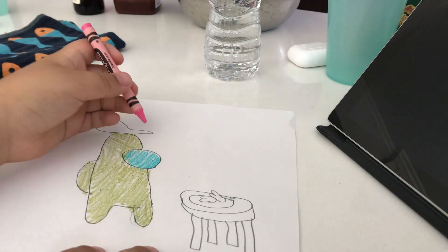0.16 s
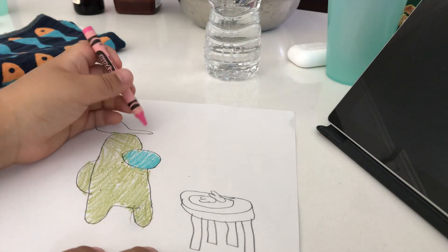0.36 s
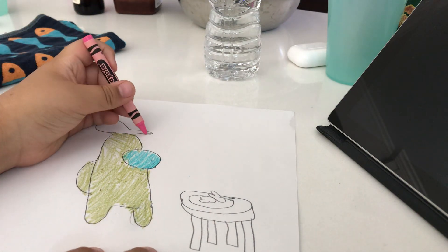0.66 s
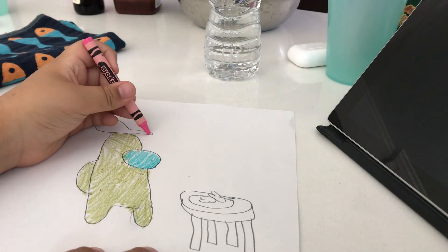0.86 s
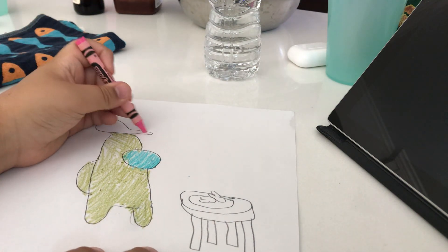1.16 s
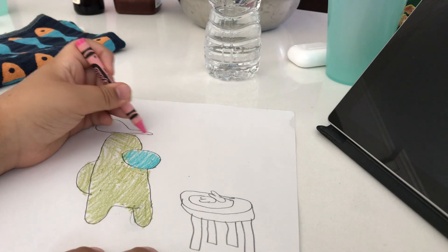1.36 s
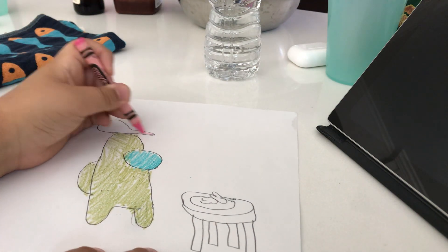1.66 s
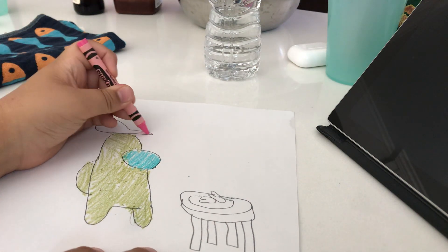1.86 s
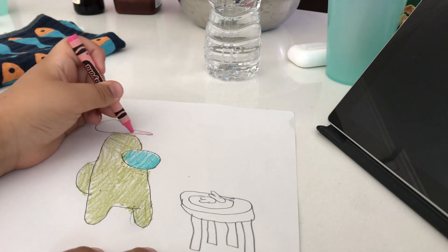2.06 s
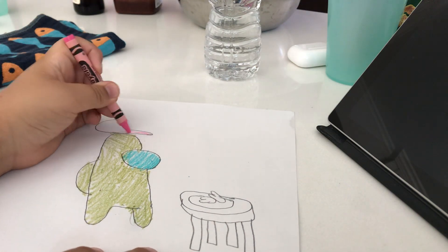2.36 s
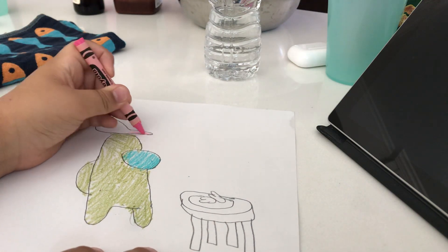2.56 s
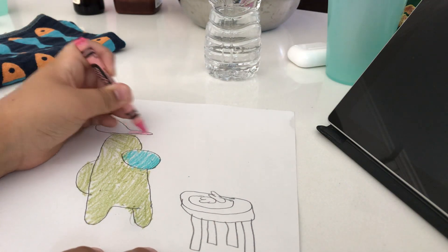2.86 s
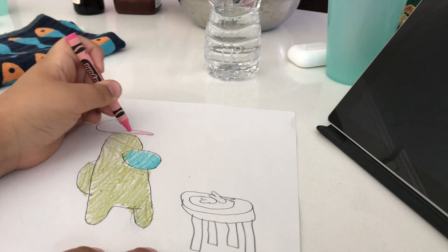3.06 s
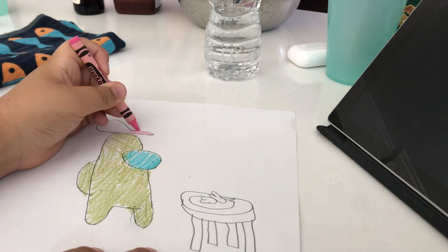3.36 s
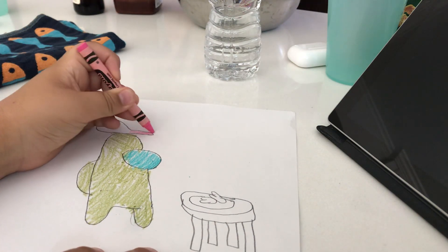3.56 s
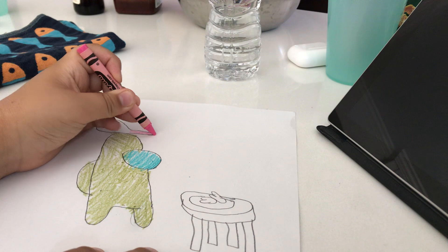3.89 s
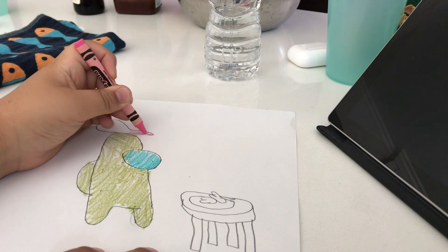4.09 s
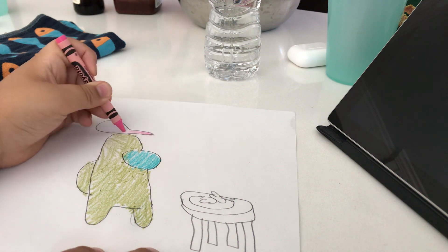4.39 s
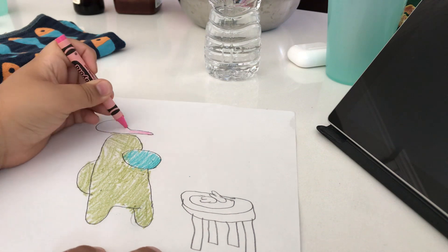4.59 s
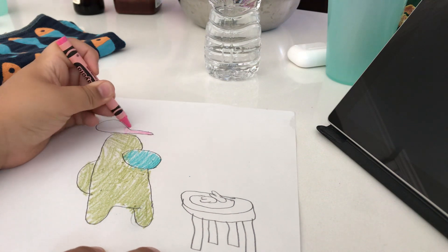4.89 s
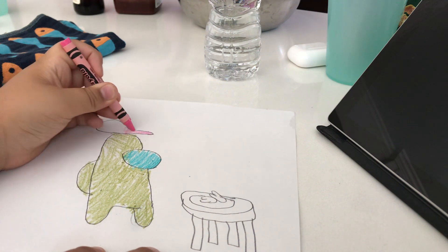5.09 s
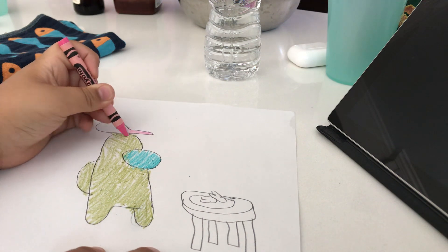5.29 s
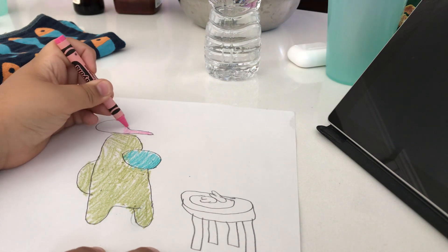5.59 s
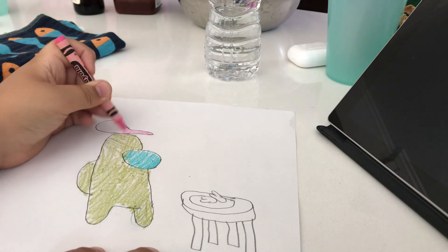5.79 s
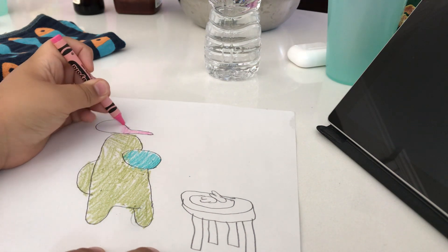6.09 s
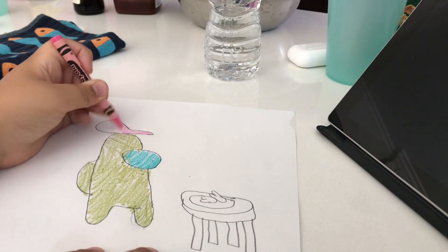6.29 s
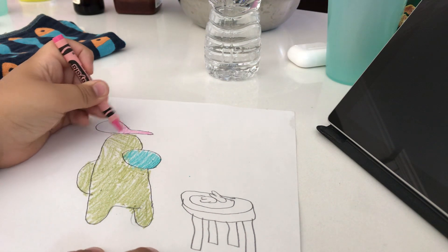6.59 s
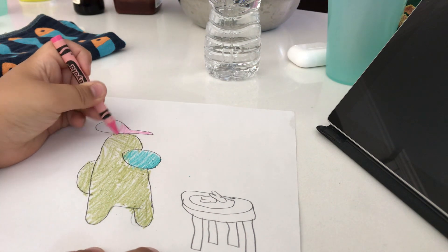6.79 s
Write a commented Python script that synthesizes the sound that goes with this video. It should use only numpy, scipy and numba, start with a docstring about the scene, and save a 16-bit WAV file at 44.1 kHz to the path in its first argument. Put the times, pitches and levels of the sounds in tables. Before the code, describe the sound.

A wax crayon rubs on paper lying on a hard table, close to the microphone in a small room. It begins with a few light touches, then firmer strokes from about 0.6 seconds, with a soft low bump of the hand at 0.7 seconds. The strokes are short, quick and uneven, a dry rasp and hiss with some resonance from the table and occasional faint, tiny squeaks. From about 2.4 seconds small waxy ticks dot the scratching, the sharpest near 3.8 seconds. The firmest rubs come around 5.5 to 5.8 seconds. A light knock on the table sounds at about 6.3 seconds, then a louder, sharp knock at 6.5 seconds, after which a hollow object rings briefly and the crayon is silent. A faint low rumble and a steady appliance hum continue underneath throughout.

```python
"""In a small room, close to a phone, a wax crayon rubs paper on a hard table in short, quick strokes.
Friction over the fibres is a train of random impulses: it makes the sheet rasp and hiss and drives
the table into a drone. Now and then the tip sticks and slips with a squeak, or wax tears with a tick.
Near the end two knocks excite the table's modes, and after the second a hollow object rings on.
The room reverberates over a steady rumble and the hum of an appliance."""
import sys
import numpy as np
from scipy import signal
from scipy.fft import rfft, irfft
from scipy.io import wavfile
from scipy.ndimage import uniform_filter1d
from numba import njit

SR = 44100
rng = np.random.default_rng(int(sys.argv[2]) if len(sys.argv) > 2 else 0)


def inscribe(sig):
    """Save sig as 16-bit PCM at rate SR to the path in sys.argv[1].

    A 1-D sig is mono; a 2-D sig holds one channel per row.
    Samples are clipped to [-1, 1] before scaling.
    """
    pcm = np.round(np.clip(np.atleast_2d(sig).T, -1, 1) * 32767)
    wavfile.write(sys.argv[1], SR, pcm.astype(np.int16))


N = 306054

# Spectral shapes: f/Hz, relative spectral level/dB
AIR_SPECTRUM = [(26, -46.5), (45, 4), (81, -2.5), (187, -4), (251, -4.5), (346, -9), (411, -11.5),
                (760, -20.5), (880, -21), (948, -34), (1020, -27), (1210, -23), (1370, -27.5), (2350, -31),
                (16000, -49.5)]  # rumble and hiss of the room
RATTLE_SPECTRUM = [(250, -28.5), (500, 3), (1000, 8), (1500, -7), (2300, -9), (3000, -10.5), (6000, -17.5),
                   (15500, -24)]  # noise of a knock
TONE_SPECTRUM = [(760, -24), (1300, -3.5), (2160, -1.5), (2470, -3.5), (2780, -5.5), (3200, -11),
                 (4160, -10.5), (7040, -120)]  # rubbed table, midrange
DRONE_SPECTRUM = [(210, -25.5), (350, 1), (553, 4.5), (927, 3.5), (1040, 7.5), (1120, 3.5), (1400, -5),
                  (1820, 8), (3080, -120)]  # rubbed table, lower range
RASP_SPECTRUM = [(1760, -34.5), (3000, -1.5), (3860, 1.5), (4750, -2.5), (5830, 1.5), (6200, -13.5),
                 (8060, -46), (13600, -120)]  # sheet, low treble
HISS_SPECTRUM = [(3650, -23.5), (6200, 3.5), (6430, 1.5), (8320, 2.5), (9320, 2.5), (10000, -2),
                 (13000, -4), (22000, -120)]  # sheet, high treble
CRISP_SPECTRUM = [(5880, -59), (10000, -8), (11500, -1.5), (13800, 2.5), (15200, 0.5), (15700, -16),
                  (16000, -3.5)]  # sheet, crisp top
# Partials of the appliance: f/Hz, frequency wander/Hz, level/dB
HUM_PARTIALS = [(77.9, 6.16, -63), (241.1, 2.98, -56.5), (394.6, 5.95, -66.5)]
# Reverberation time by band: f/Hz, T60/s
ROOM_DECAY = [(250, 0.33), (1000, 0.44), (4000, 0.52), (12000, 0.31)]
# Modes of the hollow object: f/Hz, level/dB, T60/s
VESSEL_MODES = [(951.5, -36.5, .55), (959, -37.5, .5)]
# Modes of the table top: f/Hz, relative level/dB in the first knock, the same in the second, T60/s
TABLE_MODES = [(75.5, -7, -12, 0.18), (134.6, -8, -11, 0.22), (215, -9, -6.5, 0.067), (252, -7, -8, 0.08),
               (345, -1, -16, 0.091), (374, -22, -8.5, 0.18), (405, -4, 2.5, 0.033), (635, 2.5, -5, 0.039),
               (677, -4.5, -2, 0.093), (1310, 2.5, -10, 0.043), (1484, -3, -7.5, 0.088),
               (1760, -3.5, -21, 0.087), (1856, 4, 8, 0.02), (2210, -30, -30, .08)]
# Knocks: t/s, relative level/dB, contact time/s, rattle gain/dB, crack gain/dB, wave delay at 100 Hz/s
KNOCKS = [(6.263, -20.5, 0.00023, -8, 2, 0.0097), (6.5, -11.5, 0.00032, -4, 9.5, 0.0102)]
# Soft bumps of the hand on the table: t/s, level/dB, f/Hz, T60/s
HAND_BUMPS = [(.71, -33, 157, 0.11)]
# Spells of regular stick-slip: centre t/s, relative level/dB, f/Hz, nominal duration/s
SQUEAKS = [(0.083, -45, 1725, 0.016), (0.822, -43.5, 1960, 0.023), (0.854, -48, 2000, 0.022),
           (1.32, -40.5, 2097, 0.017), (1.622, -48, 2140, 0.055), (1.773, -40, 2430, 0.011),
           (1.836, -46, 2500, 0.025), (1.876, -42, 2420, 0.022), (2.052, -44, 4500, 0.01),
           (2.118, -45, 4200, 0.008), (2.192, -51.5, 1000, 0.014), (2.396, -46, 2330, 0.022),
           (3.238, -45, 1560, 0.033), (3.51, -42, 2255, 0.014), (3.617, -48, 3840, 0.029),
           (3.669, -49.5, 964, 0.052), (3.783, -41, 1964, 0.038), (4.02, -45.5, 2200, 0.02),
           (4.145, -53, 2250, 0.03), (4.79, -44, 3700, 0.02), (5.01, -42.5, 5450, 0.034),
           (5.093, -46.5, 5900, 0.051), (5.725, -44, 2120, 0.028)]
# Tears of wax: t/s, peak level/dB, f/Hz
WAX_TICKS = [(0.6595, -37, 4700), (2.373, -26, 9800), (2.62, -28, 10100), (2.8836, -30, 11000),
             (2.9188, -33, 10300), (3.0253, -33, 11400), (3.1454, -28, 6000), (3.1553, -31, 9500),
             (3.1627, -26, 10100), (3.2132, -26.5, 8000), (3.226, -30, 7100), (3.408, -27, 5500),
             (3.4286, -23.5, 7000), (3.4976, -20, 10700), (3.531, -25, 10300), (3.5602, -18, 11500),
             (3.618, -34, 9100), (3.6583, -34, 6960), (3.828, -12.5, 11200), (3.9957, -28.5, 6000),
             (4.1164, -32, 10400), (4.19, -28, 11900), (4.216, -24, 11000), (4.2684, -27, 9700),
             (4.2818, -19, 11500), (4.7304, -25, 11400), (4.866, -28, 7900), (4.998, -25, 6330),
             (5.0745, -31, 7000), (5.459, -31, 7000), (5.5183, -20, 12900), (5.524, -25, 5460),
             (5.6508, -24, 9200), (5.6836, -27, 8850), (5.7204, -17, 8560), (5.7796, -30, 8400),
             (5.7934, -18, 10500), (5.952, -31, 10600), (6.0301, -33, 8100), (6.17, -26, 9700),
             (6.389, -37, 7800), (6.3955, -37, 5600)]
# Light drag of the tip: t/s, tone drive level/dB, sheet gain/dB, drone gain/dB (also acts on strokes)
DRAG = [(0.0, -52.5, -11, -6), (0.22, -76, -4, 4.5), (0.6, -75.5, -5, -3.5), (0.9, -58.5, -8, -2),
        (1.12, -72, 3.5, 1), (1.24, -81, -18, 6), (1.4, -56.5, -2.5, -6.5), (2.2, -60, 0, -10),
        (2.45, -52.5, -2, -5.5), (2.8, -62.5, -6.5, -9), (3.1, -54, -2, -5), (3.4, -64, -4.5, -15.5),
        (3.7, -58.5, 3.5, -6), (4.4, -63.5, -0.5, -5), (4.8, -60, 4, -10), (5.38, -61, 4, -13),
        (5.65, -58.5, 3.5, -3), (6.0, -66, 4.5, -5), (6.2, -60, -7, -4), (6.3, -110, 9, 0)]
# Strokes: t/s, duration/s, tone drive level/dB, rasp gain/dB, hiss gain/dB, catch gain/dB
STROKES = [(0.003, 0.03, -57.5, 4, -7, -4), (0.072, 0.032, -56.5, 6, -5.5, 8),
           (0.163, 0.017, -62.5, -2, -1.5, 5), (0.338, 0.012, -62.5, -4, -4, -7),
           (0.508, 0.028, -70, 0, -3.5, 0), (0.617, 0.036, -56, 2, -12, -13),
           (0.6575, 0.052, -48, 7, -2, 0.5), (0.708, 0.052, -47.5, -1, -8, -5),
           (0.768, 0.064, -52, 5, 0.5, -7), (0.844, 0.034, -51, 1.5, -4.5, -2),
           (0.931, 0.068, -59, -3, -27, 1), (1.168, 0.021, -61, -19, -23, -3),
           (1.209, 0.021, -61, -0.5, -18, -1), (1.257, 0.036, -54, 1, -9, 5.5),
           (1.312, 0.024, -51.5, 0, -2, 5), (1.349, 0.065, -53, -2.5, -9.5, -7),
           (1.437, 0.014, -50.5, -8, -6, 2), (1.4576, 0.066, -53.5, -13, -8, 2),
           (1.544, 0.011, -53, 0, -13, 7), (1.572, 0.077, -49.5, -2, -7, 5),
           (1.6824, 0.03, -52, -0.5, -9, 4), (1.743, 0.11, -54, 3, -3.5, -2),
           (1.7917, 0.11, -44, -2, -6.5, 0), (1.993, 0.019, -67.5, 7, -5, 10),
           (2.026, 0.014, -67, -4, -3, 0), (2.046, 0.0082, -62.5, 12, -6, 2), (2.091, 0.014, -71, 11, 9, 0),
           (2.113, 0.0091, -55, 13, -6, 5), (2.134, 0.03, -63, -1, -4, -6), (2.181, 0.027, -57, 4, 0, -3),
           (2.256, 0.035, -46, -0.5, -5.5, -22), (2.33, 0.016, -61, 4, 3, -5),
           (2.3745, 0.062, -45.5, -1, -5.5, 0.5), (2.449, 0.081, -51.5, 5, -2, 8),
           (2.537, 0.03, -52.5, 3, -11, 4), (2.62, 0.04, -56, 2.5, -5.5, 12),
           (2.793, 0.019, -61.5, 7, -2, -1), (2.88, 0.017, -58.5, 6, -1, 11), (2.919, 0.019, -70, 6, 8, 2),
           (2.942, 0.069, -49, 1, -3.5, 8), (3.017, 0.071, -45, -4.5, -10.5, 8.5),
           (3.1464, 0.042, -52.5, 0.5, -0.5, 7.5), (3.196, 0.049, -58, 6, -1, -6),
           (3.218, 0.04, -56.5, -4, -3, 9), (3.363, 0.018, -58.5, -10, -1, 0),
           (3.422, 0.054, -61.5, 13.5, 10.5, 4), (3.5, 0.053, -47, 0.5, 0, -1),
           (3.533, 0.065, -49, 0.5, 1, 0), (3.607, 0.061, -54.5, 1, 0, 1), (3.7135, 0.055, -60, 1, 2.5, -1),
           (3.7676, 0.038, -45, 2, 2, 2.5), (3.811, 0.089, -49, 1.5, 0, -7),
           (3.943, 0.015, -60.5, 4, -4, 2), (3.99, 0.07, -58.5, -1, -1, -1), (4.12, 0.035, -66, 2, 6, 0),
           (4.167, 0.02, -66.5, 8, 12, -3), (4.191, 0.02, -61.5, 12, 11, -2),
           (4.217, 0.049, -59.5, 3, 4, 1), (4.243, 0.026, -59, -7, -7, 0), (4.277, 0.066, -53, 2, 2.5, -4),
           (4.47, 0.016, -69, -4, -12, -4), (4.5205, 0.031, -59, 5.5, 1.5, 5), (4.564, 0.031, -57, 3, 6, 0),
           (4.59, 0.062, -47, -1, -4.5, -2), (4.697, 0.025, -64, 1, -2, -1),
           (4.729, 0.033, -64, 6, 16.5, 1), (4.781, 0.039, -61.5, 11, -10, 8), (4.86, 0.053, -72, 1, -2, 7),
           (4.925, 0.035, -57, 3, -5, 1), (4.995, 0.058, -63, 8, 10.5, 4), (5.063, 0.06, -49, 0, -3, 1),
           (5.2315, 0.042, -60.5, 3, 4.5, 2), (5.304, 0.015, -74, 1, 15, -7),
           (5.355, 0.02, -59, -11, -9, -5), (5.376, 0.056, -57.5, 0, -8, 1),
           (5.446, 0.06, -34.5, 1, -1, -19), (5.518, 0.049, -52.5, 6, 2, 8), (5.654, 0.02, -70, -2, 14, 5),
           (5.673, 0.03, -52, 1, 2, -3), (5.7156, 0.046, -42, 0, -0.5, -4.5),
           (5.744, 0.098, -41.5, 0, -3.5, -14), (5.95, 0.024, -74.5, 10, 4, 12), (6, 0.016, -80, 7, 5, -2),
           (6.044, 0.031, -54.5, -4, -2, 2), (6.103, 0.014, -52, -10, -18, -8),
           (6.167, 0.018, -54, -2, 3.5, -4), (6.181, 0.046, -57.5, -2, -3, 0),
           (6.3854, 0.014, -54, -5.5, -12, 12), (6.41, 0.07, -64.5, 4, 4, 5)]


def undb(db):
    """Amplitude ratio of a level in decibels."""
    return 10 ** (np.asarray(db) / 20)


def at_level(x, db):
    """Normalisation to an rms level in decibels."""
    return x * undb(db) / np.sqrt(np.mean(x ** 2))


def colour(x, spectrum, size=2048):
    """Minimum-phase filtering: the folded cepstrum of a spectrum gives a causal, unit-energy response."""
    hz, db = np.transpose(spectrum)
    grid_hz = np.maximum(np.arange(size // 2 + 1) * SR / size, 1)
    cepstrum = irfft(np.interp(np.log(grid_hz), np.log(hz), db) * np.log(10) / 20)
    cepstrum[1:size // 2] *= 2
    cepstrum[size // 2 + 1:] = 0
    response = irfft(np.exp(rfft(cepstrum)))
    return signal.fftconvolve(x, response / np.sqrt(np.sum(response ** 2)))[:len(x)]


def wander(rate_hz):
    """Random modulation: Gaussian values joined by straight ramps, with a spread near 1."""
    hold = int(SR / rate_hz)
    steps = np.repeat(rng.standard_normal(N // hold + 1), hold)
    return uniform_filter1d(steps, hold)[:N]


def decay(at, t60, rise_s):
    """Exponential damping: an envelope that rises at the given time and dies away."""
    t = np.maximum(np.arange(N) / SR - at, 0)
    return (1 - np.exp(-t / rise_s)) * np.exp(-t * np.log(1000) / max(t60, .003))


@njit
def resonator(x, hz, q):
    """Second-order resonance: a band-pass with unit gain at its moving centre frequency."""
    out = np.empty(len(x))
    band_state, low_state, damping = 0., 0., 1 / q
    for i in range(len(x)):
        g = np.tan(np.pi * hz[i] / SR)
        band = (band_state + g * (x[i] - low_state)) / (1 + g * (g + damping))
        band_state = 2 * band - band_state
        low_state += 2 * g * band
        out[i] = damping * band
    return out


def background():
    """Superposition of the room's broadband noise and the wavering partials of an appliance."""
    air = colour(rng.standard_normal(N), AIR_SPECTRUM, size=16384)
    out = at_level(air, db=-51) * undb(wander(2.82))
    for hz, wander_hz, db in HUM_PARTIALS:
        phase = 2 * np.pi * np.cumsum(hz + wander_hz * wander(6)) / SR
        out += undb(db + 0.9 * wander(5.9)) * np.sqrt(2) * np.sin(phase)
    return out


def reverberation(x):
    """A diffuse field decays exponentially, each band at its own rate."""
    t, tail = np.arange(SR // 2) / SR, 0
    for hz, t60 in ROOM_DECAY:
        band = signal.butter(1, [hz / 2, min(hz * 2, SR / 2.2)], "bandpass", fs=SR, output="sos")
        tail += signal.sosfilt(band, rng.standard_normal(len(t))) * np.exp(-t * np.log(1000) / t60)
    tail *= 1 - np.exp(-(t / 0.0009) ** 2)
    return signal.fftconvolve(x, tail / np.sqrt(np.sum(tail ** 2)))[:N]


def vessel():
    """Beating: two close modes of a hollow object build up after the last knock and outlast the table."""
    onset = KNOCKS[-1][0] + .004
    t = np.arange(N) / SR - onset - .035  # the modes are in phase 35 ms after the onset
    return sum(undb(db) * decay(onset, t60, rise_s=.006) * np.sin(2 * np.pi * hz * t)
               for hz, db, t60 in VESSEL_MODES)


def knocks():
    """Impact excites a crack, a rattle and the table's modes; dispersive bending waves delay the lows."""
    out, t = np.zeros(N), np.arange(N) / SR
    for k, (at, db, contact_s, rattle_db, crack_db, delay_s) in enumerate(KNOCKS):
        crack = undb(crack_db) * decay(at, t60=0.0084, rise_s=0.0005)
        ring = crack * np.sin(2 * np.pi * 2250 * (t - at))
        for hz, *mode_db, t60 in TABLE_MODES:
            contact_gain = 1 / (1 + (2 * hz * contact_s) ** 2)  # longer contact weakens high modes
            arrival = at + delay_s * np.sqrt(100 / hz)
            envelope = undb(mode_db[k]) * contact_gain * decay(arrival, t60, rise_s=0.53 / hz)
            ring += envelope * np.sin(2 * np.pi * hz * (t - arrival))
        burst = rng.standard_normal(N) * decay(at, t60=0.13, rise_s=0.00047)
        out += undb(db - 9.5) * (ring + undb(rattle_db) * colour(burst, RATTLE_SPECTRUM))
    return out


def hand_bumps():
    """A soft impact of the hand sets the table into a low, damped vibration."""
    t = np.arange(N) / SR
    return sum(undb(db) * decay(at, t60, rise_s=0.011) * np.sin(2 * np.pi * hz * t)
               for at, db, hz, t60 in HAND_BUMPS)


def squeaks():
    """Stick-slip oscillation of the tip gives short, rough, wavering tones that swell and fade."""
    out, waver = np.zeros(N), wander(400)
    roughness = undb(5 * wander(900) - 2)
    for at, db, hz, duration in SQUEAKS:
        n = int(1.8 * duration * SR)
        start = int(at * SR) - n // 2
        phase = 2 * np.pi * np.cumsum(hz * (1 + .06 * waver[start:start + n])) / SR
        out[start:start + n] += undb(db) * np.hanning(n) * np.sin(phase)
    return out * roughness


def wax_ticks():
    """Tearing wax emits a damped transient, repeated weaker as it echoes off the table within 1 ms."""
    out, t = np.zeros(N), np.arange(96) / SR
    damping_per_s = 7360
    for at, db, hz in WAX_TICKS:
        tear = np.exp(-damping_per_s * t) * np.sin(2 * np.pi * hz * t)
        lags = (6 + 30 * rng.random(3)).astype(int)
        tick = tear + sum(0.21 * (-1) ** k * np.roll(tear, lag) for k, lag in enumerate(lags))
        out[int(at * SR):][:len(t)] += undb(db) * tick / np.abs(tick).max()
    return out


def fibre_snaps(per_s, scatter_db):
    """Shot noise of unit rms: fibres snap at random moments, a few much harder than the rest."""
    strength = undb(scatter_db * rng.exponential(size=N)) * rng.standard_normal(N)
    return at_level(strength * (rng.random(N) < per_s / SR), db=0)


def paper_span(x, hz, q, band_db):
    """Resonance of the free paper around the tip lifts one band, which moves with the hand."""
    return x + undb(band_db) * resonator(x, hz, q)


def friction_envelopes():
    """Friction drives five bands: a light drag, plus strokes that catch, sag and let go."""
    t, stroke_t = np.arange(N) / SR, np.arange(SR // 3) / SR
    sag_db_per_s, release_t60 = -72, 0.1
    times, *columns = np.transpose(DRAG)
    drag_db, sheet_db, drone_db = (np.interp(t, times, column) for column in columns)
    tone, drone = undb(drag_db), undb(drag_db - 1.5)
    rasp, hiss, crisp = (undb(drag_db + sheet_db + offset_db) for offset_db in (0.1, -5, -8))
    catch_shape = decay(0, t60=0.057, rise_s=0.0005)[:len(stroke_t)]
    for at, duration, db, rasp_db, hiss_db, catch_db in STROKES:
        attack_s = 0.0042 * undb(-0.3 * catch_db)  # a gentler catch swells more slowly
        release_db = -60 * np.maximum(stroke_t - duration, 0) / release_t60
        rub = (1 - np.exp(-stroke_t / attack_s)) * undb(db + sag_db_per_s * stroke_t + release_db)
        catch = undb(db + catch_db) * catch_shape
        span = slice(int(at * SR), int(at * SR) + len(stroke_t))
        tone[span] += rub + undb(-0.5) * catch
        rasp[span] += undb(rasp_db) * (rub + undb(-5) * catch)
        hiss[span] += undb(hiss_db) * (rub + undb(-6.5) * catch)
        crisp[span] += undb(hiss_db - 4.5) * (rub + undb(7.5) * catch)
        drone[span] += rub
    return np.array([tone, rasp, hiss, crisp, drone * undb(drone_db)])


def crayon_rubbing():
    """Source and filter: grinding excites the sheet's rasp and hiss and the table's tone and drone."""
    uneven = undb(1.1 * wander(45) + wander(160))  # the hand trembles, the paper's tooth varies
    tone_drive, rasp_drive, hiss_drive, crisp_drive, drone_drive = friction_envelopes() * uneven
    grains = fibre_snaps(per_s=12000, scatter_db=2.1)
    grains += undb(-17) * fibre_snaps(per_s=150, scatter_db=0.6)  # sparse crackle of wax
    crisp_flicker, hiss_flicker = undb(2.8 * wander(70)), undb(1.04 * wander(70))
    hiss = colour(hiss_drive * hiss_flicker * grains, HISS_SPECTRUM)
    crisp = colour(crisp_drive * crisp_flicker * grains, CRISP_SPECTRUM)
    rasp = colour(rasp_drive * fibre_snaps(per_s=12000, scatter_db=0.3), RASP_SPECTRUM)
    rasp = paper_span(rasp, hz=4390 * (1 + 0.2 * wander(30)), q=5.0, band_db=1.2)
    tone = colour(tone_drive * fibre_snaps(per_s=6000, scatter_db=1.0), TONE_SPECTRUM)
    tone = paper_span(tone, hz=2226 * (1 + 0.17 * wander(20)), q=4.86, band_db=2.9)
    drone = colour(drone_drive * fibre_snaps(per_s=3000, scatter_db=0.95), DRONE_SPECTRUM)
    return hiss + crisp + undb(-5) * (rasp + tone) + drone


def scene():
    """Superposition of the direct sound, the reverberation of crayon and impacts, and the background."""
    crayon = crayon_rubbing() + wax_ticks() + squeaks()
    impacts = knocks() + hand_bumps()
    diffuse = reverberation(undb(-8) * crayon + undb(-6) * impacts)
    return (crayon + impacts + vessel() + diffuse + background())[None]


def record(dry):
    """Band limiting: the phone passes 42 Hz to 16 kHz."""
    bass_cut = signal.butter(3, 42, "highpass", fs=SR, output="sos")
    treble_cut = signal.ellip(10, .3, 70, 16000, fs=SR, output="sos")
    return signal.sosfilt(treble_cut, signal.sosfilt(bass_cut, dry))


dry = scene()
out = record(dry)
inscribe(out)
```